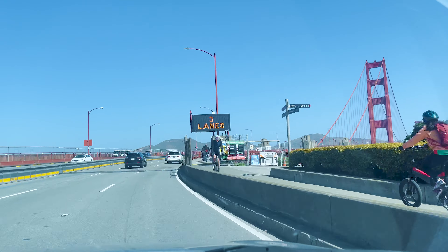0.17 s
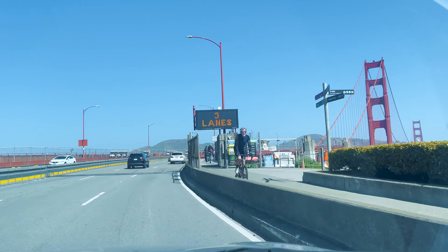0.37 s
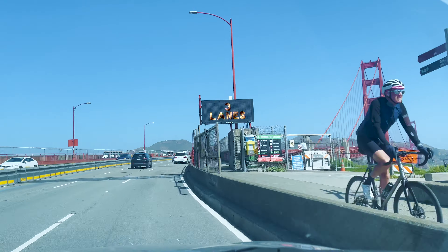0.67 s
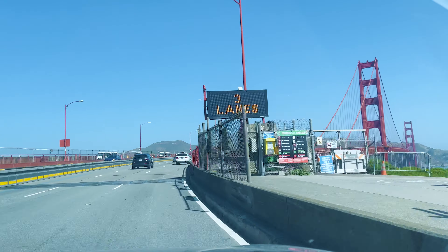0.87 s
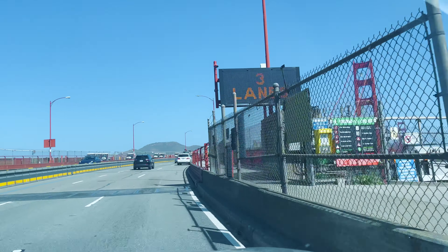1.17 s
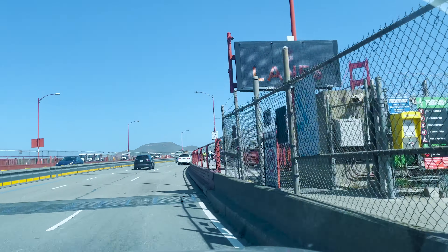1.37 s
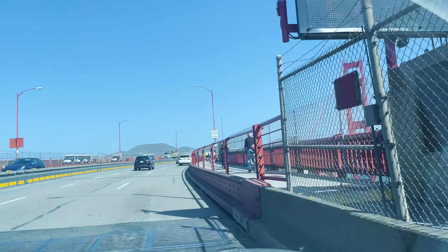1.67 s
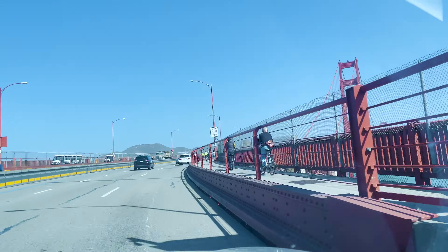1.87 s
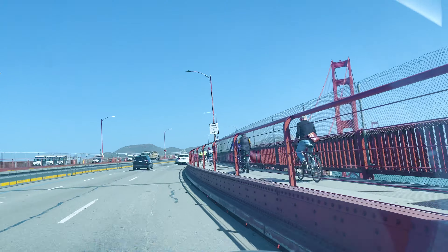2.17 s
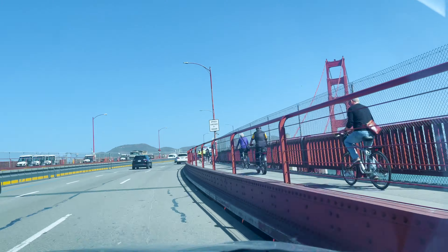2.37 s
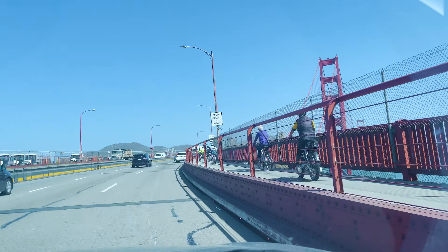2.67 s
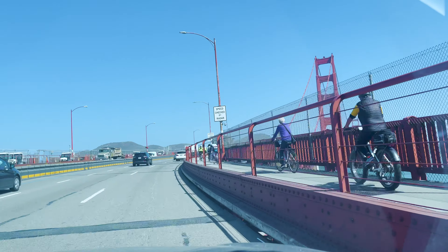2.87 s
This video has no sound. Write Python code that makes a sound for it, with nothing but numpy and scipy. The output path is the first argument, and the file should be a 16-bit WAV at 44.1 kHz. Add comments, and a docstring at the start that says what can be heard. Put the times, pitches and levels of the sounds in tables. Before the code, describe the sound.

A car rumbles along, heard from inside, thumping onto a bridge with rattles and knocks.

```python
"""Inside a car, heard from a camera near the windscreen. First, tyres on asphalt and the engine drone
through the cabin's resonances, with a soft rub and stray ticks from the camera on its support.
Around 1.5 s each axle thumps over a road patch; around 2 s both slam over the bridge joint.
From there the rougher deck roars louder and shakes the camera, which chatters and knocks three times
against its support before settling."""
import sys
import numpy as np
from scipy import signal
from scipy.fft import rfft, irfft
from scipy.io import wavfile

SR = 44100
rng = np.random.default_rng(int(sys.argv[2]) if len(sys.argv) > 2 else 0)


def bounce(signal):
    """Save signal as a 16-bit WAV file at the path given by the first command-line argument."""
    frames = np.transpose(np.atleast_2d(signal))
    limited = np.clip(frames, -1, 1)
    pcm = np.round(limited * 32767).astype(np.int16)
    wavfile.write(sys.argv[1], SR, pcm)


N = 133623
TIME, HZ = np.arange(N) / SR, np.fft.rfftfreq(N, 1 / SR)

# cabin resonances (frequency [Hz], width [Hz], asphalt gain [dB], deck gain [dB], thump gain [dB])
CABIN_MODES = [(41, 22, -22.5, -23.5, -16), (71.5, 24, -30, -19, -16), (95.4, 15, -27, -24, -19.5),
               (127.5, 9.7, -43, -22.5, -20), (169.1, 22, -34.5, -20, -14), (236.3, 14, -40, -23.5, -24),
               (342.7, 22, -53, -51, -19.5), (379.9, 11, -44.5, -32, -43), (422, 16, -54.5, -53, -24)]
# colours of the tyres on asphalt and on the deck (frequency [Hz], relative level [dB])
ASPHALT_COLOUR = [(30, -6.5), (50, 2.5), (110, -8), (200, -4.5), (300, -15), (420, -14.5), (560, -26),
                  (1050, -21.5), (1600, -33), (2100, -38.5), (3500, -47.5), (5000, -59.5), (7000, -69.5),
                  (12000, -81), (13000, -115)]
DECK_COLOUR = [(25, -24.5), (40, -12), (70, 1.5), (200, -3), (290, -9), (450, -12), (600, -24.5),
               (1100, -23), (1800, -42.5), (4000, -67.5), (14000, -120)]
# swell of the asphalt noise as a barrier comes close and recedes (time [s], gain [dB])
ASPHALT_SWELL = [(0, -2.5), (1.0, 1.27), (1.85, 1.3), (2.4, 0), (3.03, -3)]
# ride of the low rumble as the asphalt changes (time [s], gain [dB])
RUMBLE_RIDE = [(0, 8), (.22, -6.5), (.33, -0.5), (.75, -0.5), (.96, 4), (1.12, -1.5), (1.4, -3.5), (1.5, 0),
               (1.9, -0.5)]
# ride of the engine's drone (time [s], level [dB])
ENGINE_RIDE = [(0, -26), (.25, -34), (.58, -28.5), (.7, -20.5), (1.0, -28), (1.13, -39), (1.5, -19.5),
               (1.85, -23), (1.97, -15), (2.45, -21.5), (2.65, -14.5), (3.03, -18.5)]
# axles crossing the patch, then the joint (time [s], hold [s], boom gain [dB], grit level [dB])
CROSSINGS = [(1.437, 0.071, -16.5, -40), (1.56, 0.03, -18, -35), (1.923, 0.073, 0.5, -42.5),
             (2.083, 0.085, -3, -42)]
# colours of a crossing's boom and of its tread scuff (frequency [Hz], relative level [dB])
BOOM_COLOUR = [(15, -29), (40, 6.5), (100, 6.5), (250, -11.5), (500, -7), (700, -18), (1400, -26),
               (3000, -46.5), (14000, -110)]
GRIT_COLOUR = [(300, -21), (700, 13.5), (1500, 5), (2500, 0.5), (3800, -12.5), (5500, -25), (14000, -71)]
# camera knocks (time [s], crack level [dB], body level [dB], starting pitch [Hz])
KNOCK_HITS = [(1.135, -66, -28, 1180), (1.3135, -55, -27, 1210), (2.2096, -17, -9, 1460),
              (2.3829, -8, -4.5, 1100), (2.5858, -24, -13, 1400)]
# small ticks and rattles (time [s], level [dB], share of dull plastic [0-1], decay [s])
TICK_HITS = [(0.757, -46, .1, 0.0085), (1.031, -52.5, 0.07, .005), (1.316, -39, 0.67, 0.0026),
             (1.501, -39, 0.76, .003), (1.63, -41, 0.6, 0.0072), (1.936, -30.5, 0.1, 0.008),
             (1.96, -33, 0.16, 0.0074), (2.098, -33, 0, 0.0034), (2.234, -39.5, 0.1, 0.0023),
             (2.585, -29.5, 0.9, .003)]
# colours of the camera's bright case, the dull trim and the rub (frequency [Hz], relative level [dB])
CASE_COLOUR = [(400, -11.5), (1200, 15), (1700, 6), (2300, 0.5), (2900, 5.5), (5000, 1), (6700, -6),
               (8350, -2), (9300, 1), (10200, 5), (11400, 1), (12300, -15.5), (13000, -28), (16000, -35)]
TRIM_COLOUR = [(800, -4), (3500, 4), (5500, -3.5), (8000, -13), (13000, -35.5)]
RUB_COLOUR = [(1000, -18.5), (4000, -3), (7000, -6.5), (8800, -0.5), (10000, 4.5), (11200, 9.5),
              (12200, -15), (13500, -47)]
# rides of the support's soft rub and shaken chatter (time [s], level [dB])
RUB_RIDE = [(.3, -86), (.46, -62), (.74, -63), (.86, -75.5), (1.18, -80), (1.37, -65.5), (1.52, -74),
            (1.9, -78), (2.3, -64.5), (2.5, -71), (3.03, -81)]
CHATTER_RIDE = [(1.9, -82), (1.94, -36.5), (2.0, -50.5), (2.06, -49.5), (2.1, -47), (2.19, -51.5),
                (2.31, -52.5), (2.45, -64), (2.7, -67.5)]
# likeness of the cabin noise at the two microphones (frequency [Hz], correlation [-1 to 1])
STEREO_LIKENESS = [(30, .997), (70, .98), (130, .94), (270, .8), (580, .25), (1240, -.05), (2640, .21),
                   (5600, .5)]
# balance of the cabin noise (frequency [Hz], left minus right [dB])
STEREO_BALANCE = [(30, .5), (70, -1), (130, -1.7), (260, .4), (600, 1.5), (2000, .5), (3700, 3.5),
                  (9000, 1)]
# path through the case to the right microphone (frequency [Hz], gain [dB])
CASE_RIGHT_EQ = [(700, -3), (1400, -7), (2500, -5), (4000, -6.5), (7000, -5), (8000, -.5), (12000, 0)]

ON_ASPHALT, ON_DECK, IN_THUMP = 0, 1, 2  # gain columns of CABIN_MODES
CASE_LAG_S = .0003  # between the microphones


def road(asphalt_db=-25.5, patchy_db=1.18, deck_db=-21.5, deck_start_s=1.925, deck_rise_s=0.017):
    """Tyres roar on asphalt and shake the cabin; the bridge deck layers a heavier drone on top."""
    asphalt_gain = amp(asphalt_db + patchy_db * drift(12.0)) * ride(ASPHALT_SWELL)
    asphalt = asphalt_gain * stereo_noise(eq(ASPHALT_COLOUR))
    rumble = ride(RUMBLE_RIDE) * cabin_rumble(ON_ASPHALT)
    deck = cabin_rumble(ON_DECK) + amp(deck_db) * stereo_noise(eq(DECK_COLOUR))
    deck_fade_in = np.clip((TIME - deck_start_s) / deck_rise_s, 0, 1)
    return asphalt + rumble + deck_fade_in * deck


def cabin_rumble(column):
    """The cabin's resonances shaken at random, mixed by one gain column."""
    power = 0
    for hz, width, *gains_db in CABIN_MODES:
        peak = 1 / (1 + ((HZ - hz) / (0.74 * width)) ** 2) ** 2
        power = power + amp(gains_db[column]) ** 2 * peak / peak.sum()
    return stereo_noise(np.sqrt(power)) * np.sqrt(power.sum())


def axles(attack_s=0.0048, release_t60_s=.18, thud_hz=76.6, thud_t60_s=0.89, thud_db=-14, strike_db=1):
    """Each crossing thuds the suspension, strikes and shakes the cabin and scuffs the tread."""
    boom_gain = grit_gain = impacts = 0
    for start, hold, boom_db, grit_db in CROSSINGS:
        t = np.maximum(TIME - start, 0)
        attack = np.minimum(t / attack_s, 1)
        envelope = attack * amp(-60 * np.maximum(t - hold, 0) / release_t60_s)
        boom_gain += amp(boom_db) * envelope
        grit_gain += amp(grit_db) * envelope
        thud = amp(thud_db - 60 * t / thud_t60_s) * np.sin(2 * np.pi * thud_hz * t)
        impacts += attack * amp(boom_db) * (thud + amp(strike_db) * cabin_ring(t))
    boom = cabin_rumble(IN_THUMP) + amp(-16) * stereo_noise(eq(BOOM_COLOUR))
    return impacts + boom_gain * boom + grit_gain * stereo_noise(eq(GRIT_COLOUR))


def cabin_ring(t):
    """The cabin's resonances ring out after the blow of a seam's first edge."""
    return sum(amp(db) * np.exp(-np.pi * width * t) * np.sin(2 * np.pi * hz * t)
               for hz, width, _, _, db in CABIN_MODES)


def engine(firing_hz=94, pitch_waver=0.045, waver_db=2.8):
    """The firing tone, wavering in pitch and strength, half buried in the rumble."""
    turns = np.cumsum(firing_hz * (1 + pitch_waver * drift(4.7))) / SR
    return ride(ENGINE_RIDE) * amp(waver_db * drift(9)) * np.sin(2 * np.pi * turns)


def knocks(crack_s=0.0024, tail_s=0.013, tail_db=-22.5, right_db=-1):
    """The camera strikes its support: a sharp crack with a short tail, and a hollow tock."""
    cracks = bodies = 0
    for start, crack_db, body_db, hz in KNOCK_HITS:
        cracks += amp(crack_db) * (decay(start, crack_s) + amp(tail_db) * decay(start, tail_s))
        left, right = tock(start, hz), amp(right_db) * tock(start + CASE_LAG_S, hz)
        bodies += amp(body_db) * np.array([left, right])
    return bodies + through_case(cracks * random_signs(), CASE_COLOUR)


def tock(start, start_hz, end_hz=590, sag_s=.0015, peak_s=.0023):
    """A knock's body: a few hollow cycles that swell, sag in pitch and die within milliseconds."""
    t = np.maximum(TIME - start, 0)
    turns = end_hz * t + (start_hz - end_hz) * sag_s * (1 - np.exp(-t / sag_s))
    age = t / peak_s
    return age * np.exp((1 - age ** 2) / 2) * np.sin(2 * np.pi * turns)


def ticks():
    """Light contacts ring the bright case, the dull plastic trim, or both."""
    bright = sum(amp(db) * (1 - dull) * decay(start, decay_s) for start, db, dull, decay_s in TICK_HITS)
    plastic = sum(amp(db) * dull * decay(start, decay_s) for start, db, dull, decay_s in TICK_HITS)
    case_ticks = through_case(bright * random_signs(), CASE_COLOUR)
    return case_ticks + through_case(plastic * random_signs(), TRIM_COLOUR)


def rubbing(grains_per_s=1600, spread_db=-0.5, slip_db=2.2):
    """The support sticks and slides with an uneven hiss, and chatters in grains when shaken."""
    grains = (rng.random(N) < grains_per_s / SR) * random_signs()
    grains *= amp(spread_db * np.minimum(rng.exponential(1, N), 4))
    slips = unit(amp(slip_db * drift(60)))
    hiss = ride(RUB_RIDE) * slips * rng.standard_normal(N)
    chatter = ride(CHATTER_RIDE) * unit(grains)
    return through_case(hiss, RUB_COLOUR) + through_case(chatter, CASE_COLOUR)


def through_case(drive, colour, split_hz=8250, offset_rad=.5):
    """Vibration rings through the camera's case; its top treble reaches the left microphone later."""
    cepstrum = irfft(np.log(eq(colour)), N) * np.where(np.arange(N) < N // 2, 2, 0)
    response = np.exp(rfft(cepstrum))  # minimum phase: the ring follows the hit
    ringing = rfft(drive) * response / np.sqrt(np.mean(abs(response) ** 2))
    left_phase = 2 * np.pi * CASE_LAG_S * np.maximum(HZ - split_hz, 0) - offset_rad
    return irfft(np.array([ringing * np.exp(-1j * left_phase), ringing * eq(CASE_RIGHT_EQ)]), N)


def stereo_noise(spectrum):
    """Airborne noise at rms 1, nearly mono in the bass and wide above it."""
    left, independent = rfft(rng.standard_normal((2, N)))
    likeness = np.clip(curve(STEREO_LIKENESS), -1, 1)
    tilt = amp(curve(STEREO_BALANCE) / 2)
    right = likeness * left + np.sqrt(1 - likeness ** 2) * independent
    return unit(irfft(np.array([left * tilt, right / tilt]) * spectrum, N))


def drift(hz):
    """Random wander, mostly slower than hz, at rms 1."""
    return unit(irfft(rfft(rng.standard_normal(N)) / (1 + (HZ / hz) ** 4), N))


def random_signs():
    """White noise of constant magnitude."""
    return rng.choice([-1., 1.], N)


def decay(start, decay_s):
    """Instant attack, exponential tail."""
    return (TIME >= start) * np.exp(-np.maximum(TIME - start, 0) / decay_s)


def ride(points):
    """A fader move in dB, as gain over time."""
    return amp(np.interp(TIME, *np.transpose(points)))


def curve(points):
    """A table spread over log frequency, at every bin."""
    hz, value = np.transpose(points)
    return np.interp(np.log(HZ + 1), np.log(hz + 1), value)


def eq(points):
    """An EQ curve in dB, as gain per bin."""
    return amp(curve(points))


def amp(db):
    """Decibels to gain."""
    return 10 ** (np.asarray(db) / 20)


def unit(x):
    """Scales to rms 1."""
    return x / np.sqrt(np.mean(x ** 2) + 1e-20)


def scene():
    """The stereo mix in the cabin."""
    return road() + engine() + axles() + knocks() + ticks() + rubbing()


def record(dry, low_cut_hz=31, ceiling=.94, high_cut_hz=16500):
    """The microphones lose the deepest bass, peaks round off softly and the very top is cut."""
    low_cut = np.sqrt(1 - 1 / (1 + (HZ / low_cut_hz) ** 12))
    trimmed = irfft(rfft(dry) * low_cut, N)
    limited = trimmed / (1 + (trimmed / ceiling) ** 8) ** (1 / 8)
    high_cut = signal.firwin(255, high_cut_hz, window=("kaiser", 9), fs=SR)
    return signal.oaconvolve(limited, high_cut[None], "same")


dry = scene()
out = record(dry)
bounce(out)
```